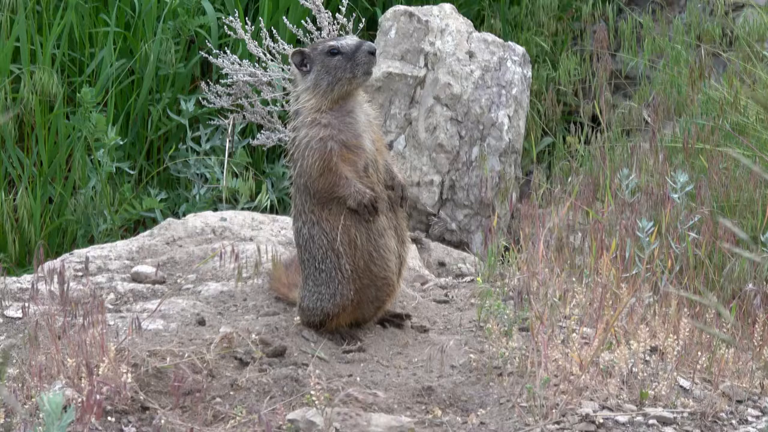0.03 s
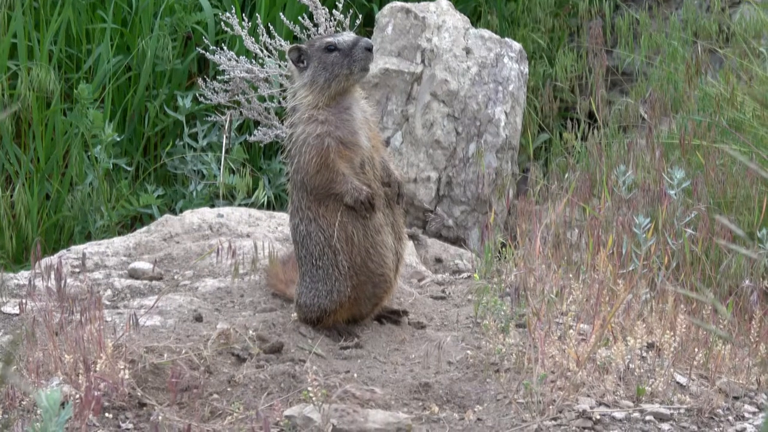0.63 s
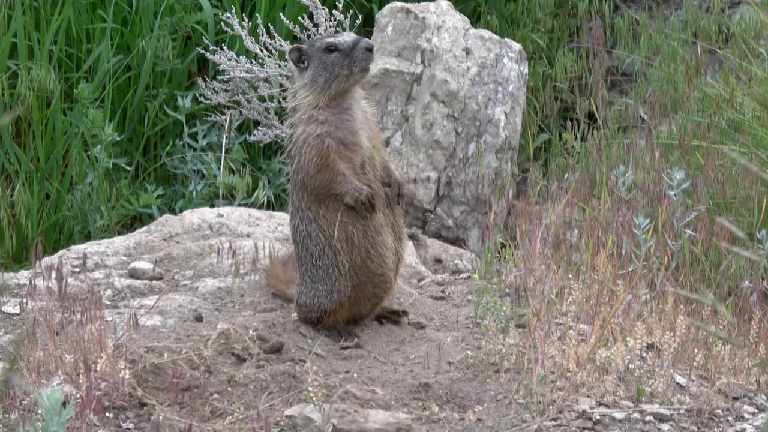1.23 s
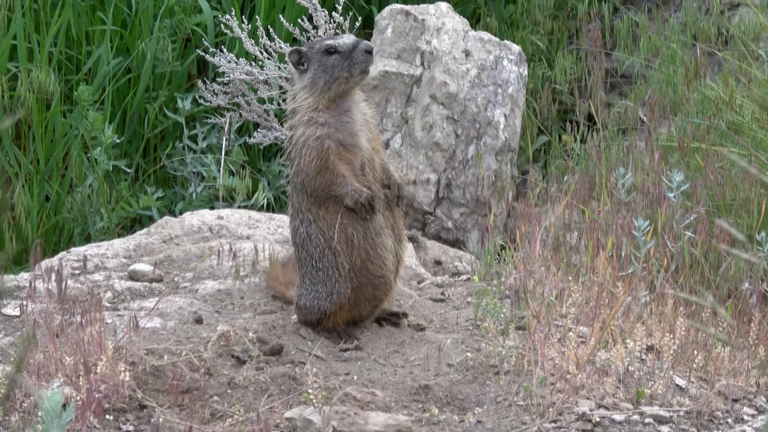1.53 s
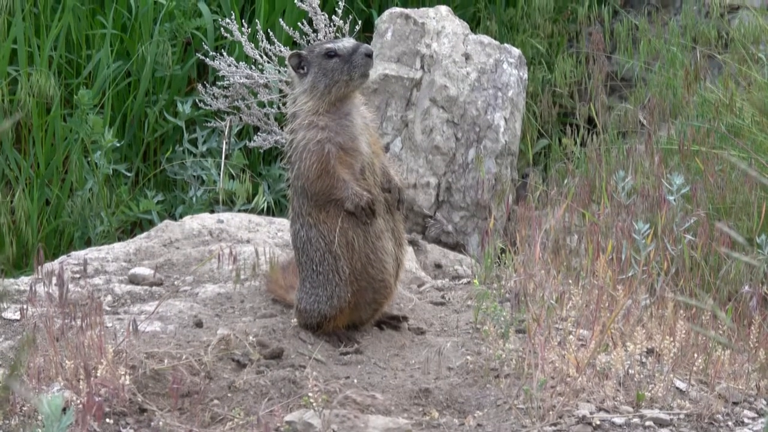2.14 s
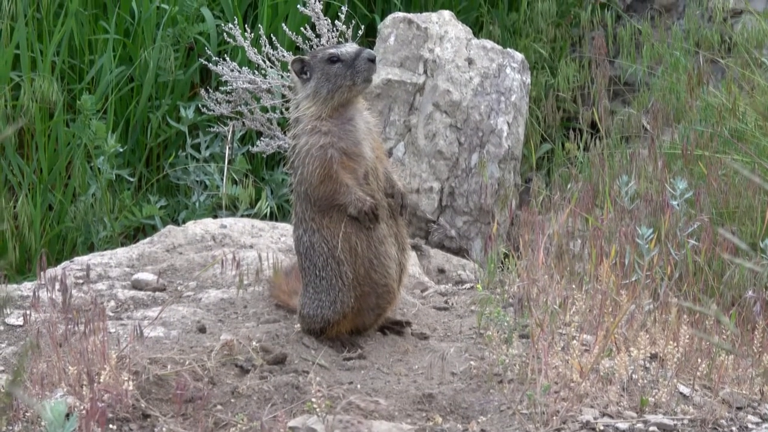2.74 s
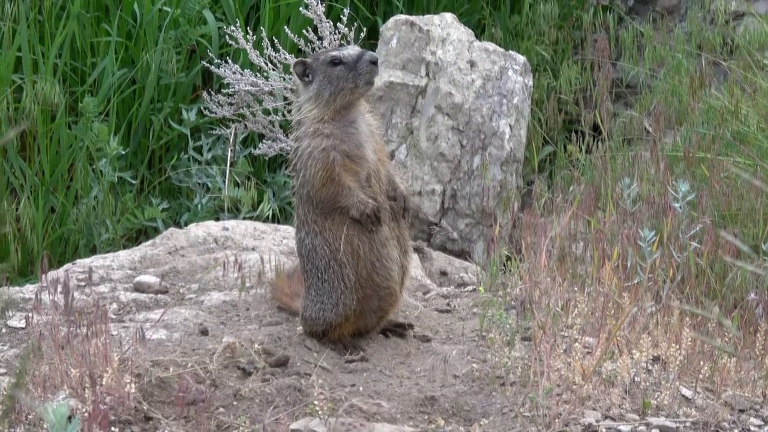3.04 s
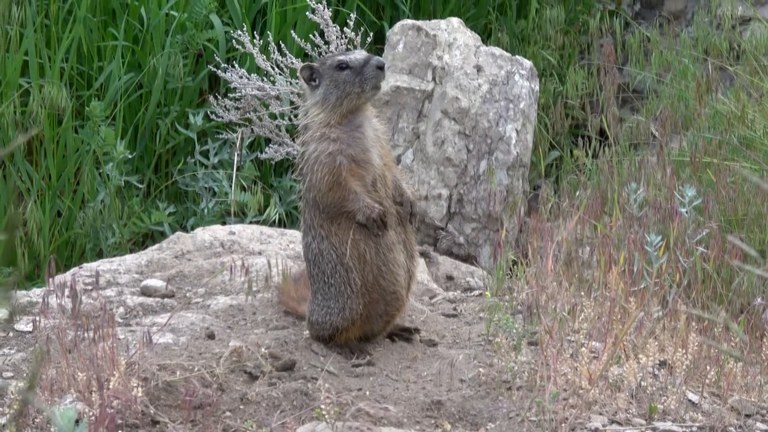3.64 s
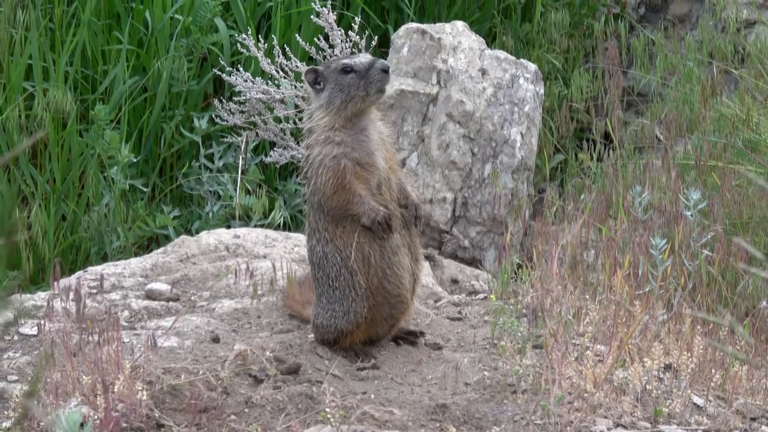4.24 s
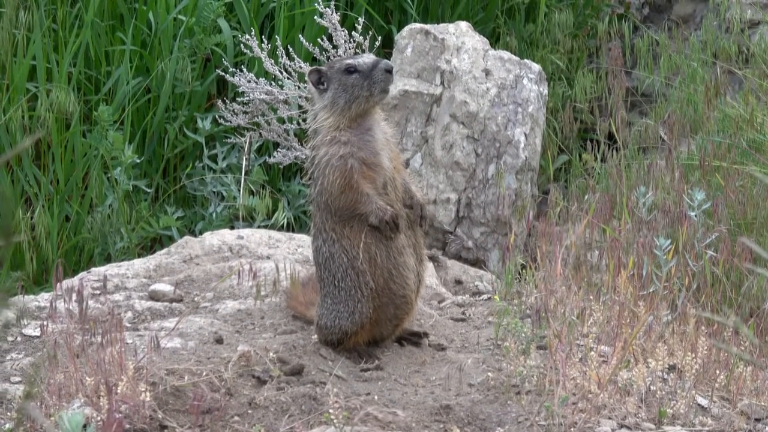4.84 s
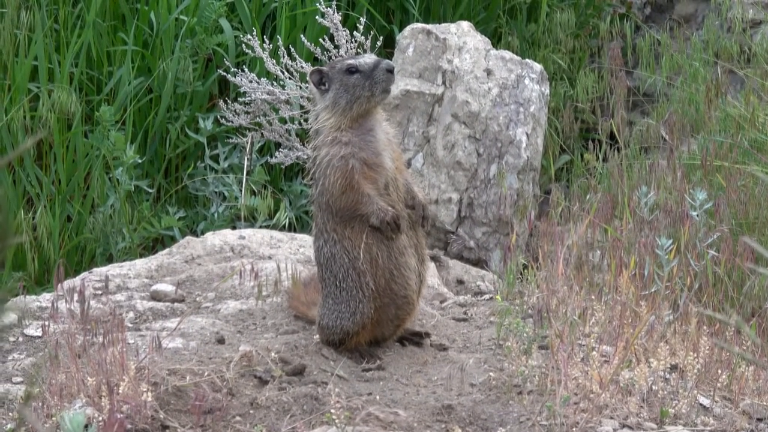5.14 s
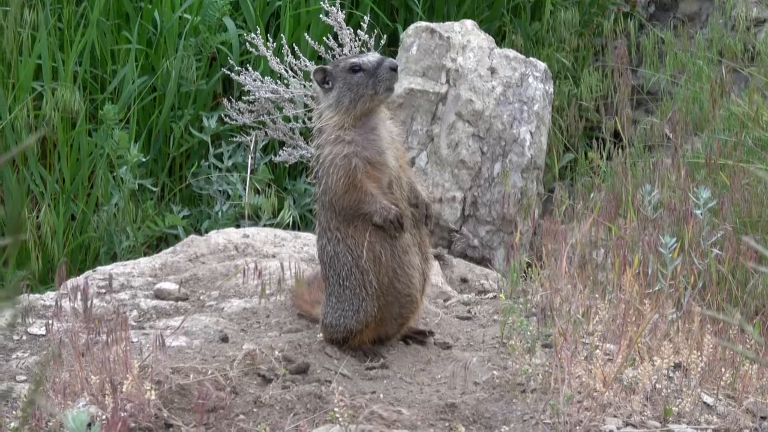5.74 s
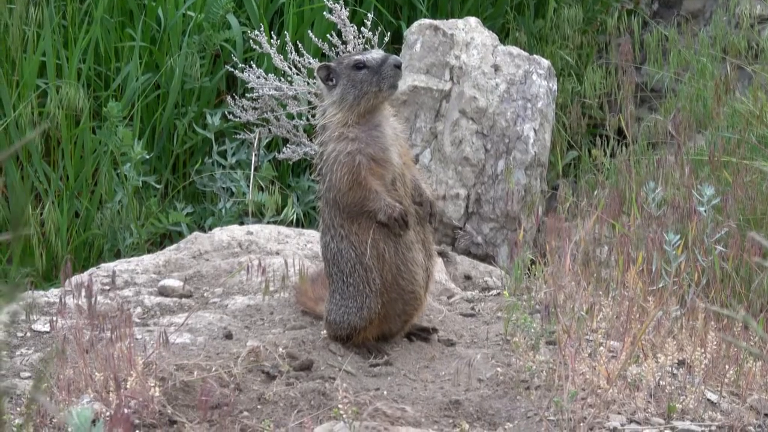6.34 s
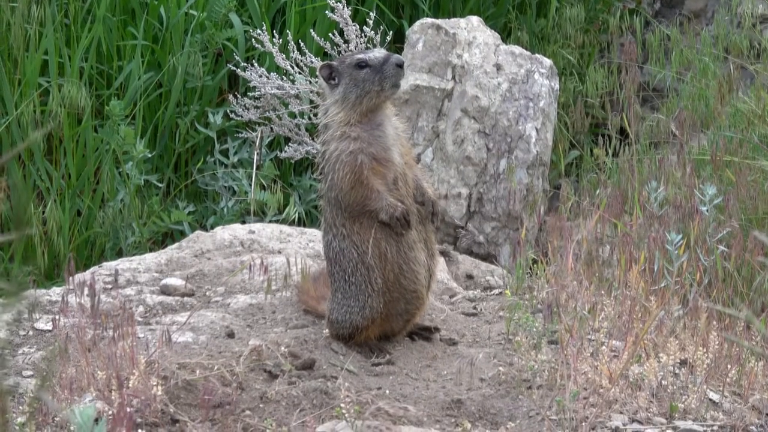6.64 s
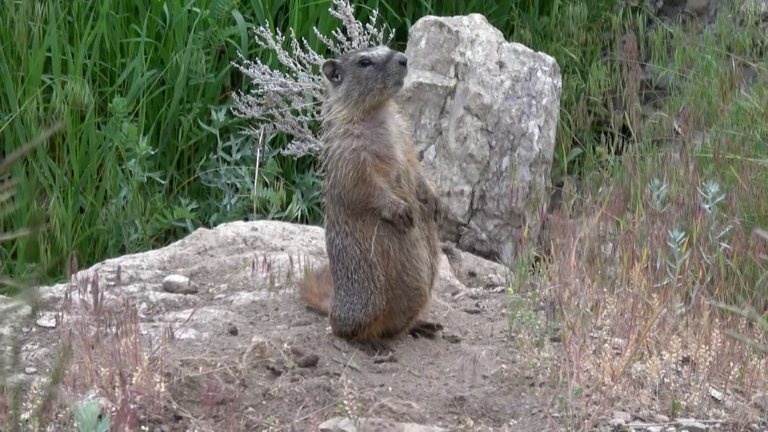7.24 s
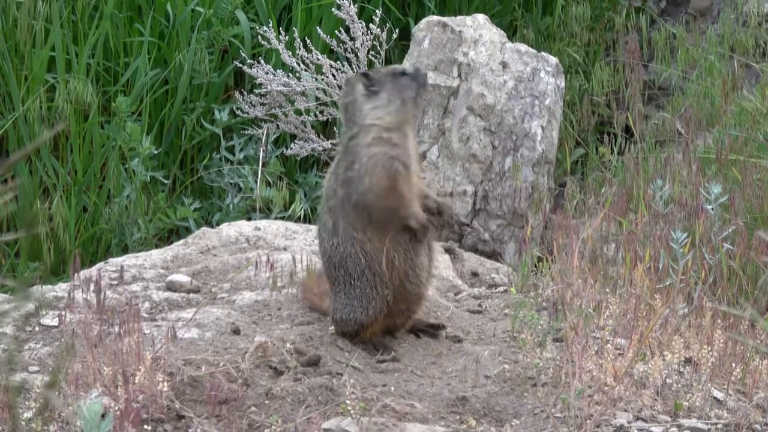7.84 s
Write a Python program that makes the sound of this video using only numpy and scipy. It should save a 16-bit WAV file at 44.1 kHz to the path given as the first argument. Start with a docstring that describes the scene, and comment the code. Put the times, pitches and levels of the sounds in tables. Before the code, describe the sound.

A marmot gives two sharp, close alarm whistles outdoors, over faint songbirds and the low rush of a distant road.

```python
"""Marmot alarm on a hillside

A marmot gives two sharp alarm whistles close by, each an arch of pitch that breaks and collapses.
The boulder behind it throws each one straight back, and the hillside lets it ring on.
Songbirds whistle, carol and trill around it in gliding pure tones. Underneath is the low rush of
what may be a distant road: swells of tyre noise and the drone of an engine."""
import sys
import numpy as np
from scipy import signal
from scipy.fft import rfft, irfft, next_fast_len
from scipy.io import wavfile
from scipy.ndimage import uniform_filter1d

SR = 44100
rng = np.random.default_rng(int(sys.argv[2]) if len(sys.argv) > 2 else 0)


def inscribe(sig):
    """Save sig as 16-bit PCM at rate SR to the path in sys.argv[1].

    A 1-D sig is mono; a 2-D sig holds one channel per row.
    Samples are clipped to [-1, 1] before scaling.
    """
    pcm = np.round(np.clip(np.atleast_2d(sig).T, -1, 1) * 32767)
    wavfile.write(sys.argv[1], SR, pcm.astype(np.int16))


N = 357210
TIME = np.arange(N) / SR

# How strong the whistle's overtones sound against its fundamental: overtone_hz, gain_db
WHISTLE_OVERTONES = [(2500, -26), (4500, 4), (5600, 9.5), (6600, -13), (7400, -22.5), (8500, -12),
                     (10000, -15), (12700, -46), (15000, -40)]
def alarm_whistle(top_hz, level_db, length_s=.052, lead_s=.008, attack_s=.00102, swell_db_per_s=123):
    """A pure arch of pitch turns raspy and collapses. Gives its start offset, voice and carrying peak."""
    t = np.arange(-lead_s, length_s, 1 / SR)
    top_s, break_s, collapse_s, fade_s = .01705, .0289, .0397, .038
    hz = top_hz * (1 - .1071 * (np.maximum(t, 0) / top_s - 1) ** 2)
    hz -= 376 * np.clip((t - break_s) / .0041, 0, 1)
    hz -= 70000 * np.maximum(t - collapse_s, 0)
    slack = np.clip(4 * (1 - hz / 3600), 0, 1)  # rasp and hiss grow below 3600 Hz
    phase = 2 * np.pi * np.cumsum(hz * (1 + .045 * slack * wander(len(t), 1000))) / SR
    voice = np.sin(phase) + amp(spectrum_at(WHISTLE_OVERTONES, 2 * hz)) * np.sin(2 * phase)
    voice += amp(spectrum_at(WHISTLE_OVERTONES, 3 * hz) + 1) * np.sin(3 * phase)
    breath_band = signal.butter(2, [5500, 12500], "bandpass", fs=SR, output="sos")
    breath = unit(signal.sosfilt(breath_band, rng.standard_normal(len(t))))
    voice += (amp(-43) + slack * amp(-19)) * breath
    # the throat sings faintly, snaps into full voice, then fades to a squeak
    onset_db = -24 * np.clip(1 - t / attack_s, 0, 1) + 8 * np.minimum(t, 0) / lead_s
    fade_db = np.clip(3100 * (t - fade_s), 0, 29)
    voice *= np.sqrt(2) * amp(level_db + onset_db + swell_db_per_s * t - fade_db)
    # the top of the arch is thrown hardest, and carries farthest
    return t[0], voice, voice * np.exp((hz - hz.max()) / 600)


# The two alarm calls: start_s, top_pitch_hz, level_db, boulder_delay_s
ALARMS = [(.2205, 4220, -13, .004198), (4.722, 4293, -12.5, .003968)]
def marmot(boulder_gain=.68):
    """Each whistle beats against its boulder echo, slaps off a bank and scatters over the hillside."""
    near, carried = np.zeros((2, N))
    # rough rock returns the fundamental but scatters the overtones away
    rough_rock = signal.butter(6, 5400, fs=SR, output="sos")
    for start_s, top_hz, level_db, delay_s in ALARMS:
        offset_s, voice, peak = alarm_whistle(top_hz, level_db)
        add(near, start_s + offset_s, voice)
        add(near, start_s + offset_s + delay_s, boulder_gain * signal.sosfiltfilt(rough_rock, voice))
        add(carried, start_s + offset_s, peak)
    stones = amp(-15) * scatter(near, t60_s=.07, delay_s=.0065, likeness=.95, dull_hz=14000)
    bank = amp(-32) * scatter(near, t60_s=.03, delay_s=.087, likeness=.94, dull_hz=4000)
    bushes = amp(-10.5) * scatter(carried, t60_s=.16, delay_s=.023, likeness=.94, dull_hz=5800)
    hillside = amp(-24) * scatter(carried, t60_s=1.3, delay_s=.063, likeness=.96, dull_hz=4800)
    return amp(-.7) * (near * pan(-.81) + stones + bank + bushes + hillside)


# Thin, high bird whistles: start_s, length_s, pitch_hz, scoop_hz, glide_hz, level_db, pan_db
THIN_NOTES = [(0.513, .24, 5560, 600, -140, -51.5, 12.5), (0.814, .17, 6000, 350, -450, -49.5, 17.5),
              (3.495, 0.068, 4290, 0, 380, -50, 0), (3.537, 0.14, 4640, 0, 1455, -41, 8),
              (3.678, 0.073, 6680, 650, 0, -45, 12), (3.81, 0.089, 7300, 450, -50, -52.5, 16),
              (5.74, .105, 5610, 135, 3, -45, 15), (5.904, 0.13, 7470, 900, 450, -47, 8),
              (6.157, 0.042, 5030, 330, 0, -41.5, 4), (6.223, 0.23, 4994, 120, -220, -39.5, 12)]
def whistling_bird(scoop_s=.024, fade_db_per_s=23, flutter_db=1.5):
    """Thin notes scoop up, glide and fade with a slight quaver, trailing off among the trees."""
    notes = np.zeros((2, N))
    for start_s, length_s, pitch_hz, scoop_hz, glide_hz, level_db, pan_db in THIN_NOTES:
        t = np.arange(0, length_s, 1 / SR)
        hz = pitch_hz - scoop_hz * np.exp(-t / scoop_s) + glide_hz * t / length_s
        quaver = 1 + .002 * wander(len(t), 60)
        phase = 2 * np.pi * np.cumsum(hz * quaver) / SR
        swell = amp(level_db - fade_db_per_s * t + flutter_db * wander(len(t), 30))
        swell *= signal.windows.tukey(len(t), .3)
        add(notes, start_s, np.sqrt(2) * swell * np.sin(phase) * pan(pan_db))
    return notes + amp(-8.5) * scatter(notes, t60_s=.8, delay_s=.0057, likeness=.59, dull_hz=9000)


def slur(length_s, start_hz, middle_hz, end_hz, level_db, pan_db):
    """One bird note: a fluttering sine that bends through three pitches."""
    progress = np.linspace(0, 1, max(round(length_s * SR), 64))
    hz = np.polyval(np.polyfit([0, .5, 1], [start_hz, middle_hz, end_hz], 2), progress)
    swell = signal.windows.tukey(len(hz), .5) * amp(level_db + 2.3 * wander(len(hz), 60))
    return np.sqrt(2) * swell * np.sin(2 * np.pi * np.cumsum(hz) / SR) * pan(pan_db)


# Pitch bends by shape, against the middle pitch: start_ratio, end_ratio
BENDS = {"arch": (.9, 0.76), "level": (0.95, 0.94), "sag": (1.13, .92), "dive": (1.5, 0.87),
         "rise": (.77, 1.15)}
def shaped_slur(shape, length_s, hz, level_db, pan_db):
    """A bird note with a named bend around its middle pitch."""
    start_ratio, end_ratio = BENDS[shape]
    return slur(length_s, start_ratio * hz, hz, end_ratio * hz, level_db, pan_db)


# Quick high chirps: start_s, shape, length_s, pitch_hz, level_db, pan_db
CHIRPS = [(.737, "arch", 0.033, 6350, -52, 15), (.77, "dive", 0.021, 4150, -47, 0),
          (.97, "rise", .08, 4500, -54, 1), (1.629, "arch", 0.12, 5700, -66, 0),
          (1.983, "dive", .028, 3500, -59, 0), (3.765, "dive", 0.011, 5600, -43, 14),
          (5.837, "rise", .046, 10150, -60.5, 15), (5.895, "rise", 0.007, 5760, -48, 12),
          (6.03, "sag", 0.031, 6130, -54, 12), (6.056, "rise", .016, 8240, -56, 19),
          (7.651, "rise", .048, 4530, -48.5, -3), (7.705, "dive", .022, 4200, -43, -3)]
# Trill syllables by name, one slur a row: offset_s, length_s, start_hz, middle_hz, end_hz, accent_db
SYLLABLES = { "hook": [(0.0027, 0.028, 4450, 4470, 3100, 2.5)], "arch": [(0, 0.01, 3580, 3980, 3700, -3),
             (.015, 0.017, 3240, 3584, 3480, 3), (.055, .022, 3500, 3100, 2750, -2)],
             "flick": [(0, 0.024, 3490, 3980, 5000, 4.5), (.02, 0.0298, 3510, 2714, 2300, -2.5),
             (.024, 0.0216, 3900, 3560, 3150, 2)], "drop": [(0, .05, 4700, 3720, 3280, -4),
             (.065, 0.052, 3930, 4660, 5230, -13)], "zigzag": [(0, 0.011, 6870, 7000, 7050, -13),
             (.015, 0.029, 7630, 5540, 4800, 0), (.046, .044, 3450, 4500, 6400, -1.5)]}
# Evenly paced trills: start_s, syllable, repeats, period_s, level_db, softer_ends_db, pan_db
TRILLS = [(1.066, "hook", 2, .085, -45.5, 2.5, 2), (1.295, "arch", 4, 0.14, -46, 1, 2),
          (4.025, "flick", 5, 0.1, -53.5, 11, -9.5), (6.648, "drop", 7, 0.15, -45.5, 4, -2),
          (6.87, "flick", 4, .102, -54, -1, -5), (6.76, "hook", 5, .125, -55, 1, -3),
          (7.807, "zigzag", 3, 0.12, -39.5, 0.5, -6.5)]
def near_birds(usual_db=-48, echo_db_per_db=.56):
    """Nearer birds chirp and repeat their syllables in trills, echoing among the leaves."""
    calls = [(start_s, shaped_slur(shape, length_s, hz, level_db, pan_db), level_db)
             for start_s, shape, length_s, hz, level_db, pan_db in CHIRPS]
    for start_s, syllable, repeats, period_s, level_db, ends_db, pan_db in TRILLS:
        for k, place in enumerate(np.linspace(-1, 1, round(repeats))):
            for offset_s, *contour, accent_db in SYLLABLES[syllable]:
                note = slur(*contour, level_db + accent_db - ends_db * place ** 2, pan_db)
                calls.append((start_s + k * period_s + offset_s, note, level_db))
    direct, echo_send = np.zeros((2, 2, N))
    for start_s, note, level_db in calls:
        add(direct, start_s, note)
        # a fainter bird is farther off, so more of it is echo
        add(echo_send, start_s, note * amp(echo_db_per_db * (usual_db - level_db)))
    leaves = scatter(echo_send, t60_s=.35, delay_s=.005, likeness=.85, dull_hz=7000)
    return amp(-.5) * direct + amp(-5) * leaves


# The far bird's tune: start_s, shape, length_s, pitch_hz, level_db
CAROL = [(0.609, "sag", 0.043, 2660, -50), (.635, "arch", 0.11, 2930, -48.5),
         (0.746, "sag", .11, 2377, -51), (1.789, "level", .1, 3026, -51),
         (2.241, "arch", 0.076, 2444, -47.5), (2.338, "arch", 0.076, 2770, -48.5),
         (2.384, "level", 0.098, 2620, -53), (2.498, "level", 0.073, 3010, -48.5),
         (2.917, "arch", .09, 3000, -55), (4.91, "level", .05, 2920, -54),
         (4.983, "level", 0.084, 2355, -52), (5.074, "sag", 0.11, 2875, -45.5),
         (5.247, "level", .1, 2416, -48.5), (5.49, "arch", .073, 2540, -47.5),
         (5.584, "arch", 0.094, 2850, -46), (5.744, "arch", .14, 2990, -45),
         (5.995, "level", .088, 3400, -53), (6.053, "arch", .048, 2830, -43),
         (6.18, "arch", 0.056, 2830, -49), (6.256, "level", 0.064, 2410, -49),
         (7.281, "arch", .058, 2910, -44.5), (7.383, "sag", .12, 2280, -50),
         (7.927, "sag", 0.048, 2540, -47.5), (8.002, "arch", 0.12, 2460, -46)]
def carolling_bird():
    """A far bird sings phrases of lower slurs, softened by a short echo."""
    song = np.zeros((2, N))
    for start_s, *note in CAROL:
        add(song, start_s, shaped_slur(*note, pan_db=3))
    echo = scatter(song, t60_s=.3, delay_s=.012, likeness=.89, dull_hz=6000)
    return amp(-2) * song + amp(-5.5) * echo


# The ebb and flow of the distant warbling: time_s, gain_db
BUSTLE = [(0, -1), (1.7, 1), (3.4, -10), (4.1, -4), (5.6, 2), (8.1, -1.5)]
def distant_chorus(chips_per_s=24, chip_hz=5300, slurs_per_s=20, slur_hz=2900):
    """Distant birds blur into a restless twitter of falling chips, with warbling below it."""
    chips, warble = np.zeros((2, 2, N))
    for k, (late, pitch, loud, side) in enumerate(rng.standard_normal((300, 4))):
        hz = chip_hz * (1 + .04 * pitch)
        note = slur(.0243, hz, .94 * hz, .862 * hz, -58 + 2 * loud, 3 * side)
        add(chips, (k + .2 * late) / chips_per_s, note)
    for k, (late, pitch, bend, glide, loud, side) in enumerate(rng.standard_normal((280, 6))):
        hz = slur_hz * np.exp(.15 * pitch)
        note = slur(.045, hz, hz * (1 + .0773 * bend), hz * (.943 + .13 * glide), -56 + 2 * loud, 3 * side)
        add(warble, (k + .5 * late) / slurs_per_s, note)
    birds = chips * amp(.6 * wander(N, 1.3)) + warble * amp(follow(BUSTLE, TIME)[0])
    return birds + amp(-2) * scatter(birds, t60_s=1, delay_s=.014, likeness=.98, dull_hz=7000)


# A far engine draws nearer and labours: time_s, firing_hz, drone_db, whine_db, rumble_db
# (the road's low end follows half of the swing in rumble_db)
ENGINE = [(0, 84.9, -80, -57.5, -55.5), (2.1, 83, -64, -57.5, -47.5), (4.9, 79.73, -58, -57, -51),
          (5.65, 79.95, -53, -50.5, -38.5), (7, 78.36, -49, -62, -43), (8.1, 77.7, -49, -48.5, -43)]
def engine(whine_ratio=7.34, whine_width_hz=22):
    """A wavering low drone at the firing rate, with a fuzzy whine geared to it."""
    hz, drone_db, whine_db, _ = follow(ENGINE, TIME)
    swell = amp(drone_db + 2.7 * wander(N, 1.6))
    wavering_hz = hz * (1 + .02415 * wander(N, 6.5))
    drone = np.sqrt(2) * swell * np.sin(2 * np.pi * np.cumsum(wavering_hz) / SR)
    phase = 2 * np.pi * whine_ratio * np.cumsum(hz) / SR
    whine = wander(N, whine_width_hz) * np.cos(phase) + wander(N, whine_width_hz) * np.sin(phase)
    return drone * pan(.68) + amp(whine_db) * whine * pan(.36)


# Far vehicles going by: closest_s, half_width_s, roar_db
PASSES = [(1.35, 0.37, -43), (2.5, 0.49, -47), (3.5, 0.28, -47.5), (6.1, 0.57, -49.5), (7.4, 0.78, -41)]
def tyre_roar_db(t, floor_db=-54):
    """Each vehicle's roar swells and fades with its distance."""
    power = sum(amp(roar_db) ** 2 / (1 + ((t - closest_s) / half_width_s) ** 2) ** 1.04
                for closest_s, half_width_s, roar_db in PASSES)
    return 10 * np.log10(power + amp(floor_db) ** 2)


# Tone of the background bed: frequency_hz, density_db
BED_TONE = [(20, -14), (45, -3), (115, 0.5), (170, -6.5), (430, -9), (800, -3.5), (1050, -6.5), (1450, -14),
            (2000, -17.5), (2900, -21), (4900, -23), (6300, -25), (10000, -30.5), (15000, -40.5)]
# How alike its left and right are: frequency_hz, arctanh_of_correlation
BED_LIKENESS = [(40, 4.5), (130, 1.65), (300, 1.7), (800, 1), (3000, 2.3), (7000, 0.2), (15000, 0)]
# Which way it leans: frequency_hz, pan_db
BED_PAN = [(60, 1), (130, -0.5), (290, -5.5), (640, 6), (1400, 5.5), (3090, -6.5), (6780, -6), (14900, -3)]
def road_and_air(rest_db=-44, roar_hz=850, roar_octaves=.63, rumble_hz=130, patchy_db=1.16):
    """Tyre roar and rumble swell apart from each other, under a faint hiss of air and leaves."""
    t = np.arange(N // 512 + 5)[:, None] * 512 / SR
    hz = np.fft.rfftfreq(2048, 1 / SR)

    def to_sound(frames):
        return signal.istft(frames.swapaxes(1, 2), nperseg=2048, noverlap=1536)[1]

    noise = rng.standard_normal((5, len(t), len(hz)))
    shared, apart = noise[0] + 1j * noise[1], noise[2] + 1j * noise[3]
    likeness = np.tanh(spectrum_at(BED_LIKENESS, hz))
    bed = np.array([shared, likeness * shared + np.sqrt(1 - likeness ** 2) * apart])
    bed *= amp(spectrum_at(BED_TONE, hz)) * pan(spectrum_at(BED_PAN, hz))[:, None]
    rest_rms = np.std(to_sound(bed).mean(0))
    roar_band = np.exp(-.5 * (np.log2((hz + 1) / roar_hz) / roar_octaves) ** 2)
    roar_db = (tyre_roar_db(t) + 48) * roar_band
    rumble_db = .5 * (follow(ENGINE, t)[-1] + 50) / (1 + (hz / rumble_hz) ** 4)
    patches = unit(uniform_filter1d(uniform_filter1d(noise[4], 8, 0), 14, 1))
    bed *= amp(roar_db + rumble_db + patchy_db * patches)
    return amp(rest_db) / rest_rms * to_sound(bed)[:, :N]


def scatter(sound, t60_s, delay_s, likeness, dull_hz):
    """Many small, dulled echoes of random sign die away; likeness is their left-right correlation."""
    t = np.arange(SR * 3 // 2) / SR
    shared, apart = rng.standard_normal((2, len(t))) * (rng.random((2, len(t))) < 1 / 8)
    echoes = np.sqrt(1 + likeness) * shared + np.sqrt(1 - likeness) * apart * [[1], [-1]]
    echoes *= amp(-60 * t / t60_s) * (t > delay_s)
    low_pass = signal.butter(2, dull_hz, fs=SR, output="sos")
    echoes = signal.sosfilt(low_pass, echoes / np.linalg.norm(echoes[0]))
    return signal.fftconvolve(sound * np.ones((2, 1)), echoes, axes=1)[:, :N]


def amp(db):
    """Decibels to gain."""
    return 10 ** (np.asarray(db) / 20)


def pan(pan_db):
    """Left and right gains, the left louder by pan_db."""
    return amp(np.array([[.5], [-.5]]) * pan_db)


def unit(x):
    """Scales to rms 1."""
    return x / np.sqrt(np.mean(abs(x) ** 2) + 1e-20)


def wander(n, rate_hz):
    """Smooth random drift of rms about 1, rolling off above the rate."""
    size = next_fast_len(n + 4096)
    roll_off = np.exp(-(np.fft.rfftfreq(size, 1 / SR) / rate_hz) ** 2)
    return unit(irfft(rfft(rng.standard_normal(size)) * roll_off, size))[:n]


def spectrum_at(points, hz):
    """Reads a curve on a log-frequency axis."""
    points_hz, values = np.transpose(points)
    return np.interp(np.log(hz + 1), np.log(points_hz + 1), values)


def follow(rows, t):
    """Reads every column of an automation curve at the times t."""
    times_s, *columns = np.transpose(rows)
    return [np.interp(t, times_s, column) for column in columns]


def add(mix, start_s, sound):
    """Mixes a sound in at its start time."""
    part = mix[..., max(round(start_s * SR), 0):][..., :sound.shape[-1]]
    part += sound[..., :part.shape[-1]]


def scene():
    """The marmot in front, birds and road behind."""
    voices = marmot() + whistling_bird() + carolling_bird() + near_birds()
    return voices + distant_chorus() + road_and_air() + engine()


# The two microphone ports drift apart in the treble: frequency_hz, left_lead_rad
PORT_PHASE = [(0, 0.1), (5400, -0.055), (8400, -0.42), (10000, -0.75), (15000, 0)]
def record(dry, start_s=.116, limit_db=-12.5, recovery_db_per_s=200, hold_share=.82, cutoff_hz=15100):
    """The microphone opens after a brief silence; peaks are held down and the top treble is cut."""
    turn = spectrum_at(PORT_PHASE, np.fft.rfftfreq(N, 1 / SR)) * np.array([[.5], [-.5]])
    at_ports = irfft(rfft(dry) * np.exp(1j * turn), N)
    power_db = 10 * np.log10(abs(uniform_filter1d((dry ** 2).mean(0), size=44)) + 1e-12)
    fall_db = TIME * recovery_db_per_s
    peak_db = np.maximum.accumulate(power_db + fall_db) - fall_db
    over_db = uniform_filter1d(np.maximum(peak_db - limit_db, 0), size=44)
    held = at_ports * amp(-hold_share * over_db) * (TIME > start_s)
    low_pass = signal.firwin(511, cutoff_hz, window=("kaiser", 9), fs=SR)
    return signal.oaconvolve(held, low_pass[None], "same", axes=1)


dry = scene()
out = record(dry)
inscribe(out)
```